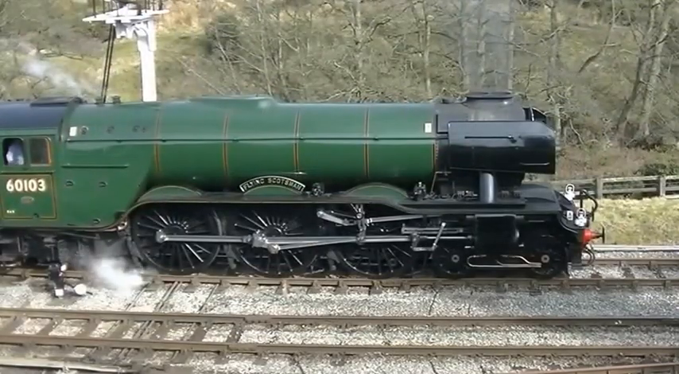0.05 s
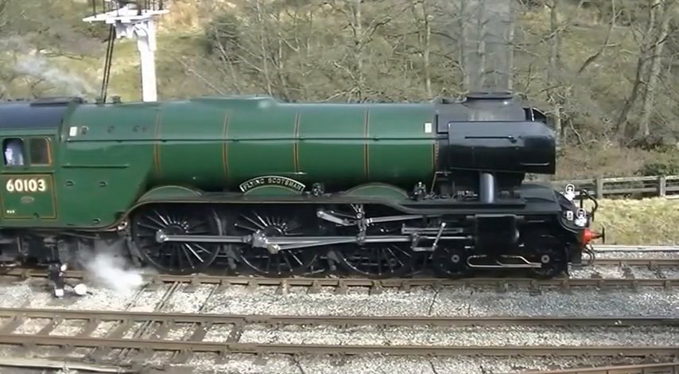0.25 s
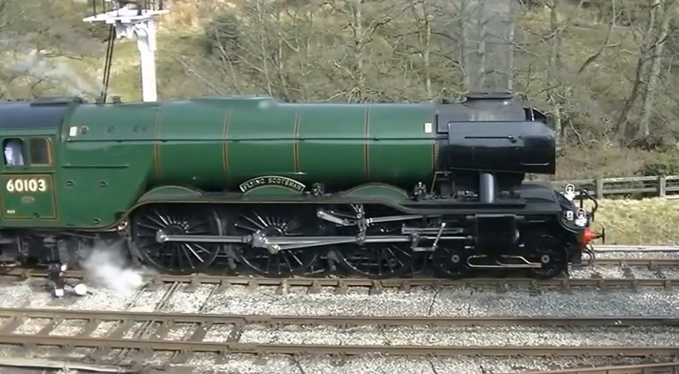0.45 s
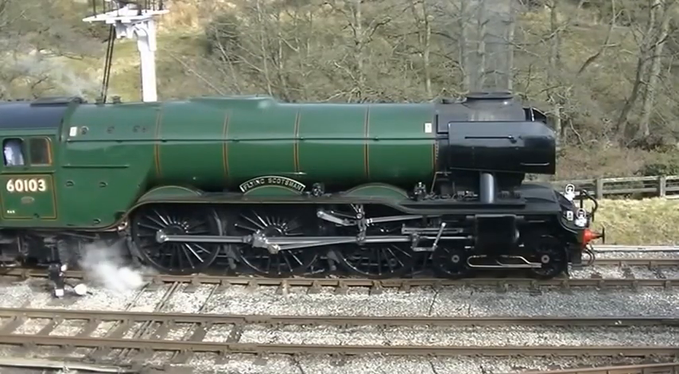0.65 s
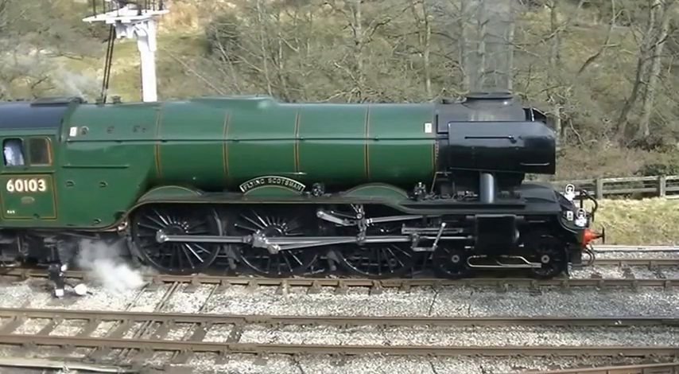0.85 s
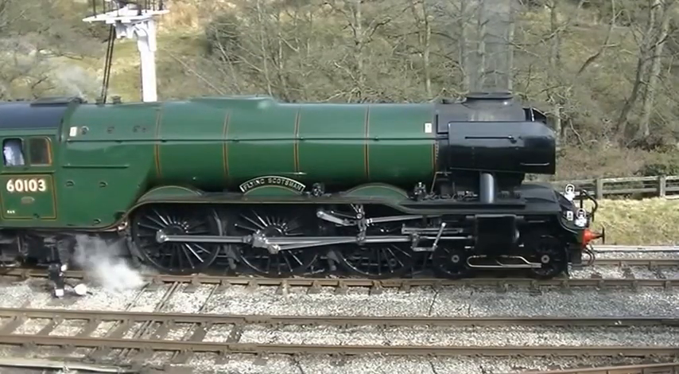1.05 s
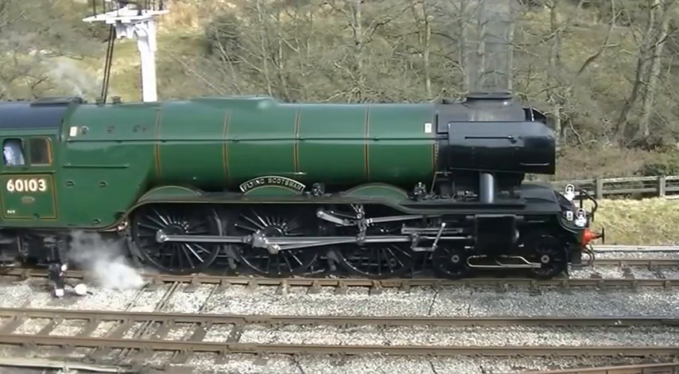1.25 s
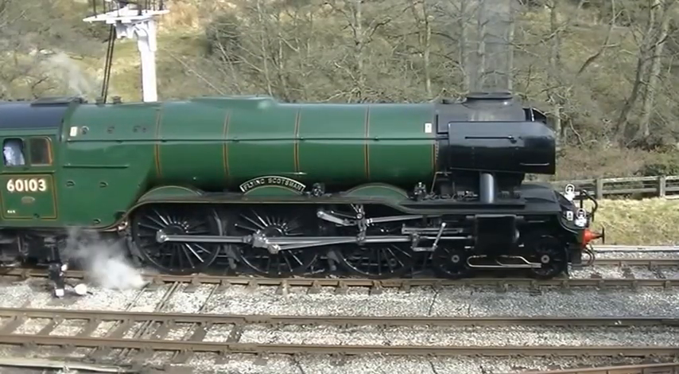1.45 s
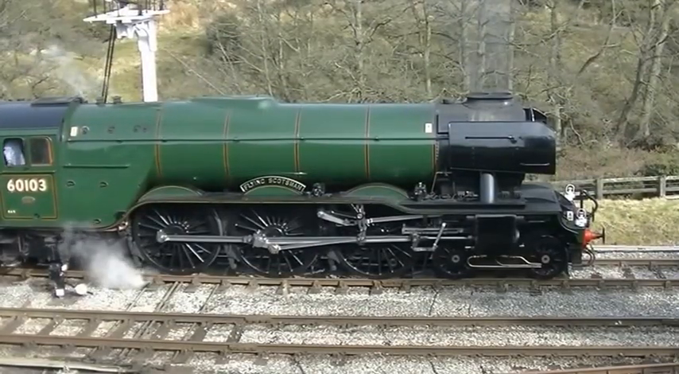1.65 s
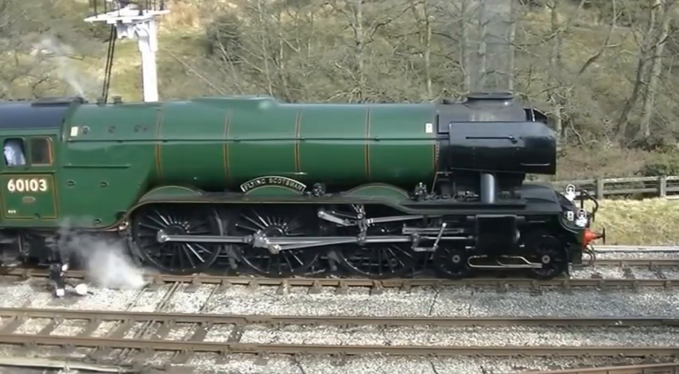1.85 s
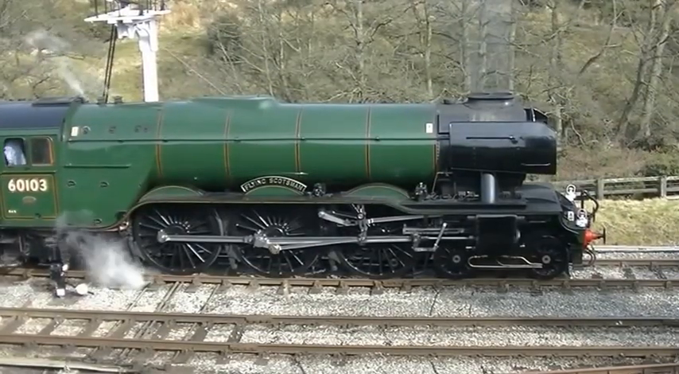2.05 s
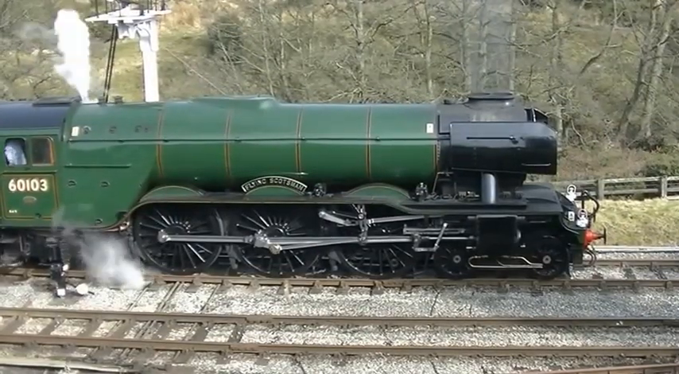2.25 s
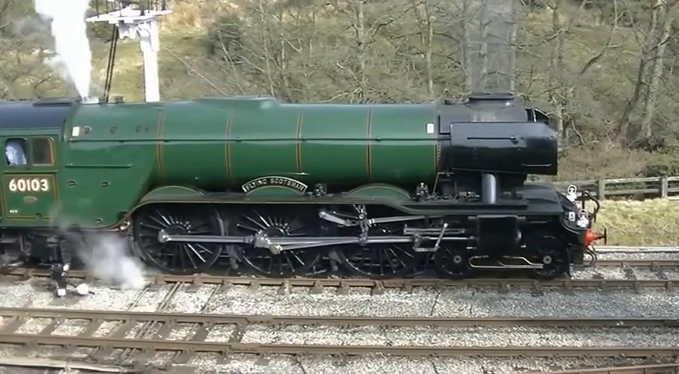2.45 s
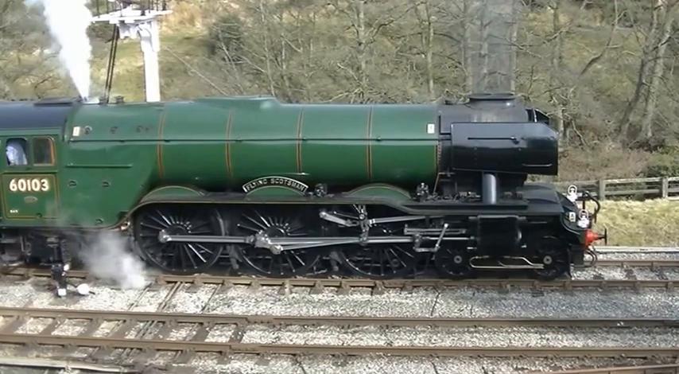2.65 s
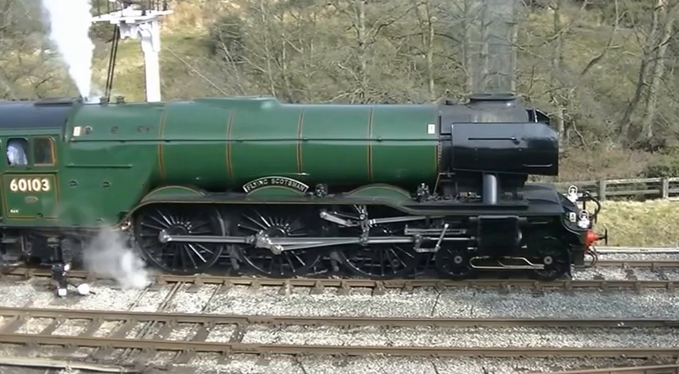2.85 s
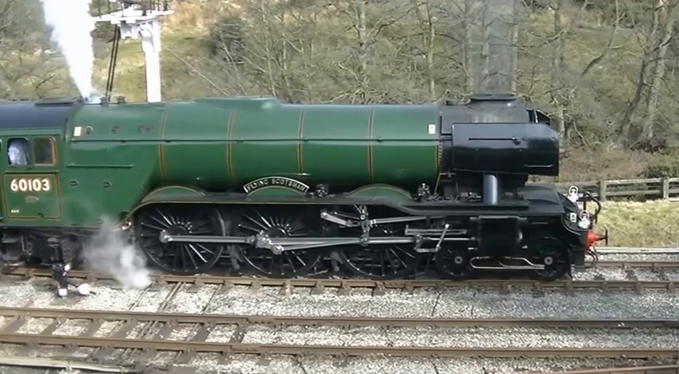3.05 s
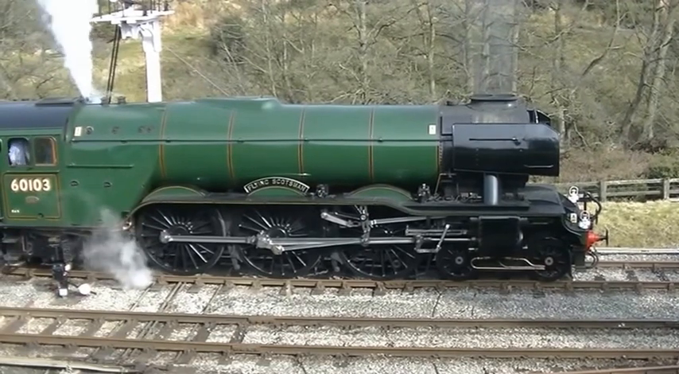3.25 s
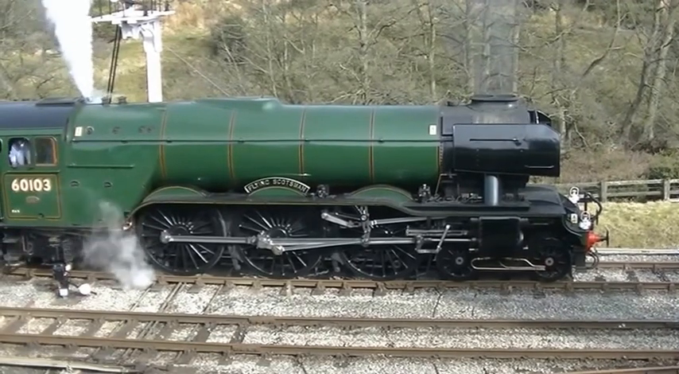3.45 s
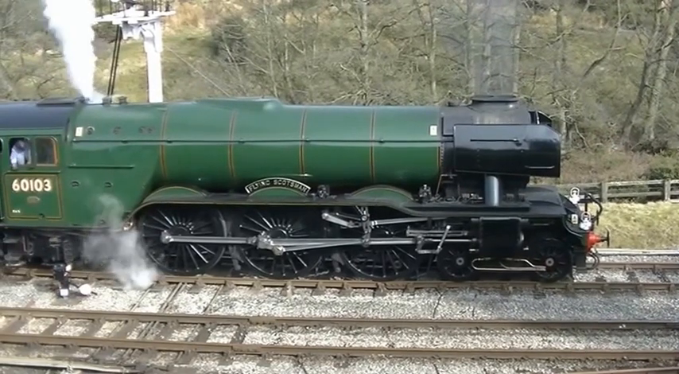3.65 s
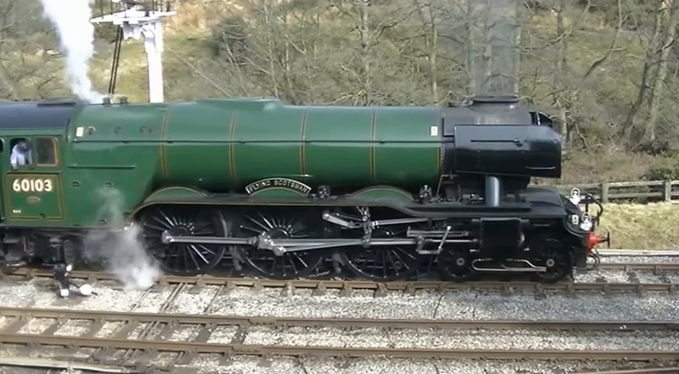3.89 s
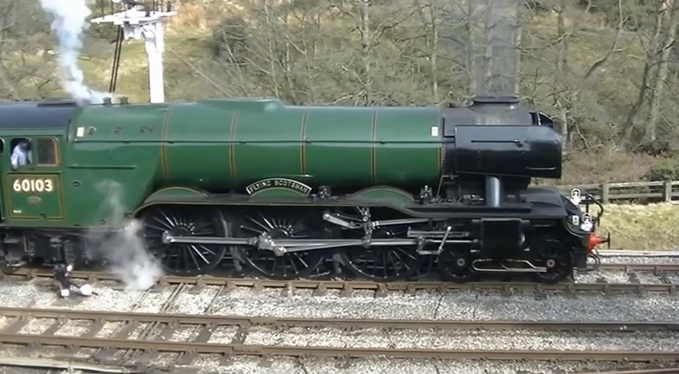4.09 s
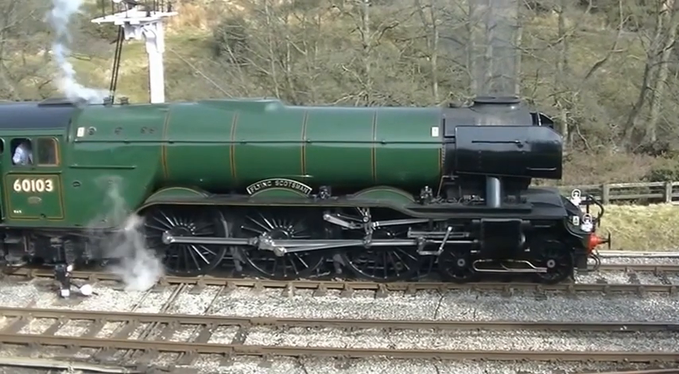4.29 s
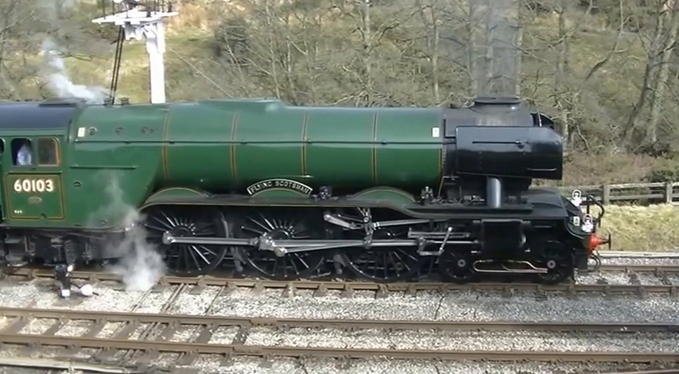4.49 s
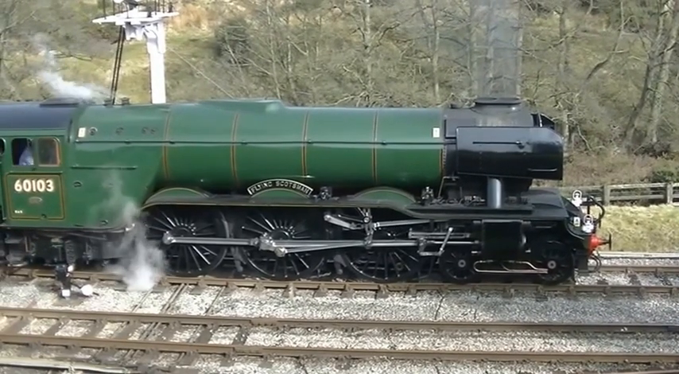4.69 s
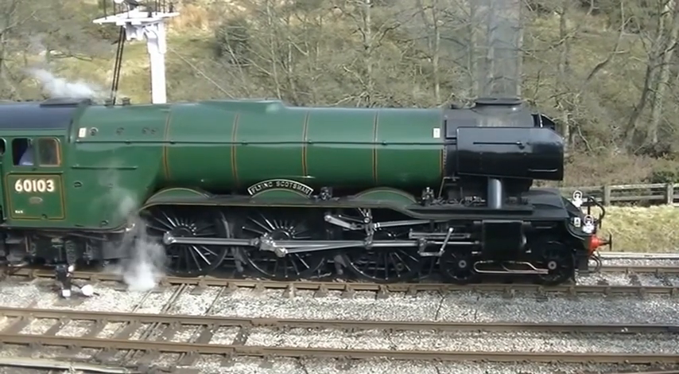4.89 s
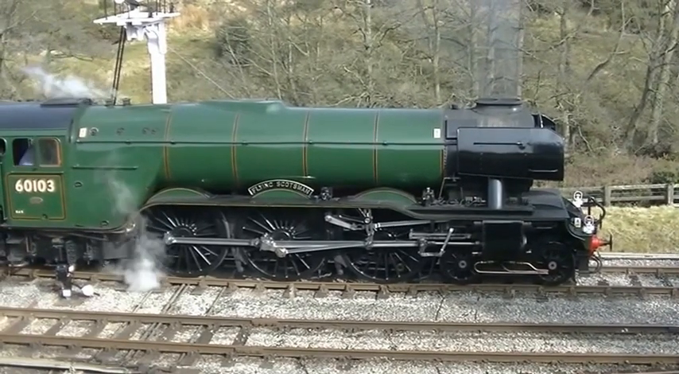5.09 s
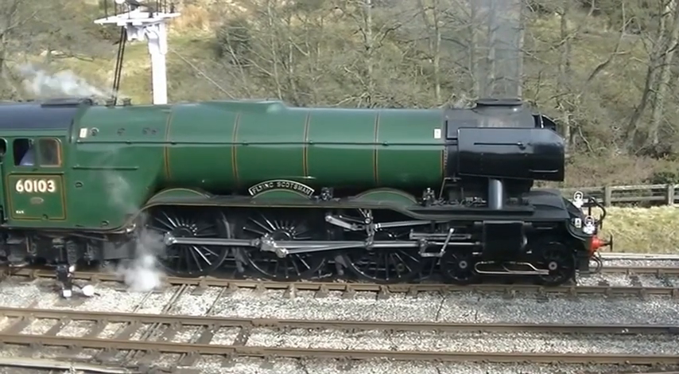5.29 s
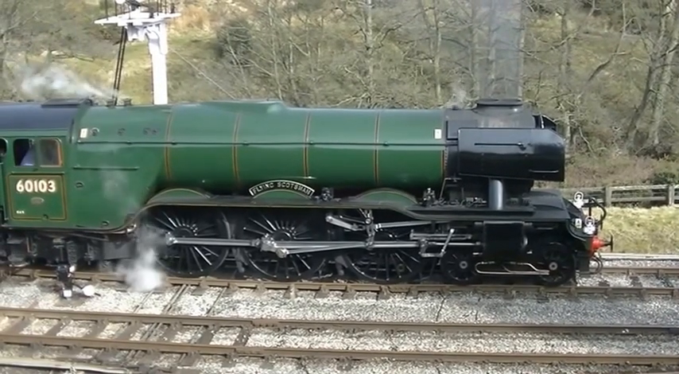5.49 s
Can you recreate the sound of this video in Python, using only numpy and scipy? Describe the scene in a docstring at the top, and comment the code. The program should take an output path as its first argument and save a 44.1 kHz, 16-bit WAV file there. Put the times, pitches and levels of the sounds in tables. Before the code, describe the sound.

A standing steam locomotive hisses steadily from a drain under its cab. About two seconds in, a puff and a rush of steam lead into one shrill whistle blast, which slides slightly up in pitch, holds for about a second and a half and cuts off. A faint echo fades off a wooded hillside while the hiss continues with a light sizzle. Heard outdoors through a camera's stereo microphone.

```python
"""Beside a wooded hillside, a standing steam locomotive heard on a camera's stereo microphone.
A drain under the cab hisses steadily. The whistle valve opens with a puff and a rush of steam;
the jet sets the bell sounding one shrill note, which climbs to pitch as the bell warms, holds,
and echoes off the hill. The camera's gain control pushes the hiss down while the whistle sounds."""
import sys
import numpy as np
from scipy import signal
from scipy.fft import rfft, irfft
from scipy.io import wavfile
from scipy.ndimage import uniform_filter1d

SR = 44100
rng = np.random.default_rng(int(sys.argv[2]) if len(sys.argv) > 2 else 0)


def unload_wav(signal):
    """Save mono or channel-first audio to the path in sys.argv[1] as 16-bit WAV at rate SR, clipped to [-1, 1]."""
    wavfile.write(
        sys.argv[1],
        SR,
        np.round(np.clip(np.atleast_2d(signal).T, -1, 1) * 32767).astype(np.int16),
    )


N = 243873
TIME = np.arange(N) / SR
FRAME_S, BIN_HZ = np.arange(N // 128 + 5) * 128 / SR, np.fft.rfftfreq(512, 1 / SR)
OPEN_S, EASE_S, SHUT_S = 2.212, 2.89, 3.925  # one pull on the valve: opens, eases back, snaps shut
SPEAK_S, ATTACK_S = 2.354, 0.03  # the bell speaks once the flow is strong, and builds this fast
# how the whistle's steam reaches the two microphone ports
# (frequency [Hz], likeness [0-1], left minus right [dB], left lead [rad])
WHISTLE_PORTS = [(500, 0.99, -0.1, 0.01), (2400, 0.998, 0.0, 0.0), (3400, 0.889, -0.1, 0.02),
                 (4300, 0.829, -1.7, 0.53), (5400, 0.831, -1.0, 0.74), (6400, 0.67, 7.9, -0.37),
                 (7400, 0.591, 0.7, -0.8), (8700, 0.869, -2.0, -0.05), (10300, 0.768, -3.5, 0.0),
                 (11400, 0.242, -3.3, 0.08), (12300, 0.447, -0.0, -0.24), (14200, 0.653, -0.3, -2.9)]


def whistle(level_db=-7, hot_hz=3036, wobble_rad=0.65, rasp_rad=0.079):
    """The bell sounds one shrill note, shaken by its own jet and rising as hot steam fills it."""
    # partials of the note (multiple, left [dB], right [dB], left lead [rad])
    harmonics = [(1, 1, 1.5, 0.26), (2, -20, -31, 4), (3, -32, -29, 0.4), (4, -55, -56, 0),
                 (5, -48, -48, 4.5)]
    # even overtones break off and catch again while the bell warms (time [s], level [dB])
    even_level = [(2.38, -8), (2.47, 4), (2.6, -20), (2.645, 1), (2.69, 4), (2.718, -14), (2.745, 1),
                  (2.81, 4), (2.843, -14), (2.875, 1.5), (2.99, 3), (3.07, -6.5), (3.14, 2.5), (3.27, -0.5),
                  (3.42, -3), (3.52, 3), (3.7, -4), (3.79, 1), (3.93, -9)]
    # odd overtones, brightest when the steam is wet (time [s], level [dB])
    odd_level = [(2.38, -8), (2.47, -3), (2.6, -6), (2.685, 8.5), (2.75, 1), (3.0, 1), (3.22, -2),
                 (3.36, 4.5), (3.65, 3.5), (3.72, -2), (3.87, 0), (3.93, -10)]
    # chirps and chokes as the note starts and ends (time [s], half length [s], gain [dB], bend [Hz])
    catches = [(2.361, 0.0042, 4, -67.5), (2.366, .002, -16, -0.5), (2.369, 0.0073, 4.5, 24),
               (2.4, .004, -6, -1.5), (2.442, 0.0064, -2.5, 38), (2.463, 0.01, -6.5, -2),
               (3.875, .006, -3, 2), (3.917, 0.0064, -13, -82)]
    blow = flow() ** 1.96 * rise(SPEAK_S, ATTACK_S)
    weak = (1 - blow / blow.max()) ** 2  # a weak blow rasps and sputters
    air_hz = 102.2 * np.exp(-since(SPEAK_S) / 0.0301)  # flat until the air is blown out
    cold_hz = 150 * np.exp(-since(SPEAK_S) / .33)  # and until the bell has warmed
    hz = hot_hz - air_hz - cold_hz - 9000 * since(SHUT_S)  # sags as the valve shuts
    catch_db = 0
    for s, half, db, bend_hz in catches:
        catch = pulse(s, half)
        catch_db += db * catch
        hz += bend_hz * catch
    # the bell holds the pitch while turbulence pushes the phase back and forth
    phase = 2 * np.pi * np.cumsum(hz) / SR + wobble_rad * wander(rate_hz=15.4)
    phase += rasp_rad * (1 + weak) * wander(rate_hz=270)
    note = np.zeros((2, N))
    for k, left_db, right_db, lead in harmonics:
        partial = amp([[left_db], [right_db]]) * np.sqrt(2) * np.sin(k * phase - np.array([[0], [lead]]))
        if k > 1:
            partial *= amp(along(odd_level if k % 2 else even_level, TIME) + 2 * wander(rate_hz=39))
        note += partial
    tremble_db = 0.65 * wander(rate_hz=150)
    sputter_db = 2.2 * weak * wander(rate_hz=45)
    return note * blow * amp(level_db + catch_db + tremble_db + sputter_db)


def hillside(note, engine_db=-19, trees_db=-25):
    """The note reaches the microphone directly, off the nearby engine, and from the slope farther off."""
    # the direct note shifts between the microphone ports (time [s], left minus right [dB])
    balance = [(2.38, -4), (2.46, 2.5), (2.6, 1), (2.75, 2), (2.95, 0.3), (3.22, 3), (3.55, 2), (3.9, 1)]
    # echoes off the hill (delay [s], left [dB], right [dB])
    hill_echoes = [(0.07, -31, -31), (0.21, -34, -35), (.31, -29, -29), (.45, -29, -29)]
    direct = note * amp(along(balance, TIME) * np.array([[.5], [-.5]]))
    engine = amp(engine_db) * scatter(note, delay_s=.004, t60_s=0.07)
    echoes = sum(amp([[left], [right]]) * np.roll(note, round(delay * SR), axis=1)
                 for delay, left, right in hill_echoes)
    trees = amp(trees_db) * amp([[-2.5], [1.5]]) * scatter(note, delay_s=0.11, t60_s=2.1)
    return direct + engine + echoes + trees


def flow(opening_s=0.18, closing_s=0.011, ease_db=6.5):
    """Steam through the whistle valve, 0-1: it drives the note, the rush and the sizzle."""
    eased = amp(-ease_db * (since(EASE_S) / (SHUT_S - EASE_S)) ** 2)
    return rise(OPEN_S, opening_s) * eased * np.exp(-(since(SHUT_S) / closing_s) ** 2)


def lip_rush(level_db=-23.5):
    """Steam rushes past the whistle's lip, growing with the flow."""
    # broad spectrum of the rush (frequency [Hz], level [dB])
    shape = [(25, -40), (150, -49), (300, -41.5), (550, -23.5), (900, -31.5), (1550, -21), (2400, -11),
             (3050, -0.5), (4500, -17), (7200, -21), (10200, -17), (11300, -31), (15500, -32.5)]
    # resonances of the bell (frequency [Hz], width [Hz], lift [dB])
    peaks = [(637, 270, 9.5), (1120, 510, 26), (1911, 250, 8.5), (2696, 70, 6.5), (3980, 490, 9),
             (4970, 650, 14.5), (6120, 900, 7.5), (7900, 200, 10), (8880, 820, 2.5), (12173, 998, 4)]
    rush = jet(shape, peaks, WHISTLE_PORTS, patchy_db=2.0, flutter_db=0.5, drift_db=1.5)
    return amp(level_db) * flow() ** 1.3 * rush


def valve_sizzle(level_db=-41, weep_db=-49.5, weep_s=4.55):
    """Wet steam sizzles and spits in the valve, which starts to weep after the blast."""
    # broad spectrum of the sizzle (frequency [Hz], level [dB])
    shape = [(100, -58.5), (3000, -21), (6000, -2), (8800, -7), (10200, -10), (11500, -17), (15500, -22.5)]
    # resonances of the valve's gap (frequency [Hz], width [Hz], lift [dB])
    peaks = [(8000, 260, 3), (8870, 600, 4.5)]
    # slugs of water spit through (time [s], half length [s], level [dB])
    slugs = [(2.69, 0.041, -32), (2.98, 0.16, -36.5), (3.49, 0.22, -36), (3.782, 0.062, -49),
             (4.395, .1, -55), (4.68, 0.097, -42.5)]
    spurts = [amp(db) * pulse(s, half) for s, half, db in slugs]
    level = np.linalg.norm([amp(level_db) * flow(), amp(weep_db) * rise(weep_s, .06), *spurts], axis=0)
    return level * jet(shape, peaks, WHISTLE_PORTS, patchy_db=2.5, flutter_db=1.3, drift_db=1.0)


def cough(level_db=-36.5, rise_s=.008, fade_s=0.046):
    """The first steam clears the cold bell with a hollow puff that trails into the note."""
    # spectrum of the puff (frequency [Hz], level [dB])
    shape = [(100, -47), (350, -26.5), (700, -5), (1200, -4.5), (1650, -5), (2400, -6), (3200, -25),
             (8000, -28), (15500, -48)]
    level = amp(level_db) * rise(OPEN_S, rise_s) * (1 - rise(SPEAK_S, fade_s))
    return level * jet(shape, [], WHISTLE_PORTS, patchy_db=1.5, flutter_db=7.0, drift_db=-1.0)


def undertone(pitch_hz=2850, width_hz=24, rest_db=-49, slack_db=-38, slack_s=1.53):
    """Steam seeping past the valve makes the bell's resonance sing faintly until the note takes over."""
    seep = np.hypot(amp(rest_db), amp(slack_db) * rise(slack_s, .35))  # the lever's slack is taken up
    seep *= 1 - rise(SPEAK_S, ATTACK_S)
    phase = 2 * np.pi * pitch_hz * TIME
    return seep * (wander(width_hz) * np.cos(phase) + wander(width_hz) * np.sin(phase))


def drain(ring_hz=2860, ring_width_hz=280):
    """The steady jet under the cab; its resonances swell and fade one by one."""
    # broad spectrum of the jet (frequency [Hz], level [dB])
    shape = [(25, -46), (150, -42), (280, -30), (600, -19.5), (1200, -2), (2200, -5), (2500, -8),
             (4400, -1.48), (5500, -2), (7200, -18), (10400, -21.5), (11500, -28), (15500, -36)]
    # resonances of the pipe and the space under the frames (frequency [Hz], width [Hz], gain [dB])
    peaks = [(224.4, 30, 11), (275, 24, -6.5), (449, 21, 6), (508, 105, 10), (666, 53.5, 17),
             (740.6, 65, 12.5), (777, 17, 10.5), (874, 22, 3.5), (1009, 127, 10), (1193, 33, 3.5),
             (1285, 31, 5.5), (1430, 87, 6.5), (1514, 17, 7), (1660, 137, 6.5), (1654, 20.5, 5.5),
             (1924, 130, 9), (2105, 60, 6), (2333, 67, 3.5), (2500, 100, 1), (2720, 57, 10.5),
             (2872, 172, 10), (3414, 213, 8), (3819, 200, 13), (4140, 190, 6), (4700, 110, -1.5),
             (4980, 130, 8.5), (5262, 126, 9.5), (6020, 140, -6.5), (6530, 740, 5.5), (7610, 170, 9.5),
             (12800, 980, 6)]
    # notches between them (frequency [Hz], width [Hz], gain [dB])
    notches = [(700, 24, -4.5), (817, 24, -3.5), (902, 24, -7), (1105, 37, -5), (1500, 18, -6),
               (1780, 60, -2), (2296, 40, 1.5), (2510, 55, -5.5)]
    # resonances that sway at random in the breeze (frequency [Hz], width [Hz], depth [dB])
    swaying = [(734, 220, 0.84), (3340, 350, 2), (4290, 560, 1.5), (4730, 130, 6)]
    # the drain's ring around ring_hz (time [s], gain [dB])
    ring_level = [(0, 10.5), (.15, 0), (.85, 0), (1.1, -11.5), (1.3, -3.5), (1.5, 5.5), (1.63, -13.5),
                  (1.75, 3), (2.1, 2), (4.4, 1.5), (5.53, 1)]
    # how the hiss reaches the two microphone ports
    # (frequency [Hz], likeness [0-1], left minus right [dB], left lead [rad])
    ports = [(300, 0.968, -1.0, 0.03), (1000, 0.974, -1.3, 0.17), (2400, 0.98, -0.1, -0.03),
             (2950, 0.786, -3.9, -0.3), (3500, 0.888, -4.5, 0.45), (5300, 0.909, -2.4, 0.51),
             (6000, 0.694, 3.8, 1.22), (6800, 0.718, 5.3, 0.39), (8200, 0.571, 3.6, -1.14),
             (10400, 0.676, -5.3, -0.16), (11600, 0.206, -4.6, 1.7), (12800, 0.693, -0.6, 0.4),
             (14500, 0.137, -0.4, 3.0)]
    # steam leaving the drain (time [s], level [dB])
    level = [(0, -28.5), (2.15, -28.5), (3.9, -33), (4.5, -30), (5.53, -31)]
    sway_db = np.outer(along(ring_level, FRAME_S), bump(BIN_HZ, ring_hz, ring_width_hz))
    for hz, width, depth_db in swaying:
        breeze = np.interp(FRAME_S, TIME, wander(rate_hz=5))
        sway_db += depth_db * np.outer(breeze, bump(BIN_HZ, hz, width))
    hiss = jet(shape, peaks + notches, ports, patchy_db=2.0, flutter_db=0.12, drift_db=0.5,
               sway_db=sway_db)
    return amp(along(level, TIME)) * hiss


def jet(shape, peaks, ports, patchy_db, flutter_db, drift_db, sway_db=0):
    """Turbulent steam noise of rms 1, coloured by resonances and picked up at two microphone ports."""
    grid = (len(FRAME_S), len(BIN_HZ))
    swirl_db = patchy_db * eddies(grid, frames=12, bins=6)  # single resonances flare up
    swirl_db += flutter_db * eddies(grid, frames=10, bins=80)  # the whole jet flutters
    swirl_db += drift_db * eddies(grid, frames=48, bins=3)  # its colour drifts in the breeze
    swirl_db *= at_hz([(500, 0.5), (3500, 1)], BIN_HZ)  # the deep roar is steadier than the treble
    noise = rng.standard_normal((2, *grid)) + 1j * rng.standard_normal((2, *grid))
    noise *= amp(swirl_db + sway_db)
    common, apart = rfft(signal.istft(noise.swapaxes(1, 2), nperseg=512, noverlap=384)[1][:, :N])
    hz = np.fft.rfftfreq(N, 1 / SR)
    colour_db = at_hz(shape, hz) + sum(db * bump(hz, f, width) for f, width, db in peaks)
    port_hz, *columns = np.transpose(ports)
    alike, balance_db, lead = (at_hz(np.c_[port_hz, column], hz) for column in columns)
    right = (alike * common + np.sqrt(1 - alike ** 2) * apart) * np.exp(-1j * lead)
    pair = np.array([common * amp(balance_db / 2), right * amp(-balance_db / 2)])
    return unit(irfft(pair * amp(colour_db), N))


def scatter(x, delay_s, t60_s):
    """Many faint echoes of random sign, dying away, different at each port."""
    t = np.arange(SR) / SR
    taps = rng.standard_normal((2, SR)) * (rng.random((2, SR)) < 1 / 20)
    taps *= (t > delay_s) * amp(-60 * t / t60_s)
    return signal.fftconvolve(x, taps / np.linalg.norm(taps, axis=1, keepdims=True), axes=1)[:, :N]


def eddies(grid, frames, bins):
    """Random patches of rms 1 over time and frequency."""
    smooth_in_time = uniform_filter1d(rng.standard_normal(grid), frames, axis=0)
    return unit(uniform_filter1d(smooth_in_time, bins, axis=1))


def wander(rate_hz):
    """Smooth random motion of rms 1, up to the given rate."""
    hz = np.fft.rfftfreq(N, 1 / SR)
    return unit(irfft(rfft(rng.standard_normal(N)) / (1 + (hz / rate_hz) ** 4), N))


def since(start_s):
    """Seconds gone by since a moment; zero before it."""
    return np.maximum(TIME - start_s, 0)


def rise(start_s, lag_s):
    """Climbs from 0 towards 1 with the given time constant."""
    return 1 - np.exp(-since(start_s) / lag_s)


def pulse(peak_s, half_s):
    """A smooth swell and fall around a moment, 0-1."""
    return np.exp(-((TIME - peak_s) / half_s) ** 2)


def bump(hz, centre_hz, width_hz):
    """Bell-shaped outline of one resonance, 0-1."""
    return .5 ** ((2 * (hz - centre_hz) / width_hz) ** 2)


def at_hz(points, hz):
    """Reads a spectrum on a log-frequency axis."""
    f, value = np.transpose(points)
    return np.interp(np.log(hz + 1), np.log(f + 1), value)


def along(points, s):
    """Reads a curve at the given times."""
    return np.interp(s, *np.transpose(points))


def amp(db):
    """Decibels to amplitude."""
    return 10 ** (np.asarray(db) / 20)


def unit(x):
    """Scales to rms 1."""
    return x / np.sqrt(np.mean(x ** 2) + 1e-20)


def scene():
    """At the microphone: one whistle blast and its echoes over the hiss of the drain."""
    return drain() + cough() + lip_rush() + valve_sizzle() + undertone() + hillside(whistle())


def record(dry, threshold_db=-25.5, ratio=7.8, recovery_db_per_s=48, rumble_db=-93, cutoff_hz=15780):
    """The camera's gain control, a faint low rumble in the microphone, and the band limit."""
    power_db = 10 * np.log10(abs(uniform_filter1d((dry ** 2).mean(0), size=1100)) + 1e-12)
    fall = TIME * recovery_db_per_s
    held_db = np.maximum.accumulate(power_db + fall) - fall  # clamps at once, lets go gradually
    duck_db = uniform_filter1d(np.maximum(held_db - threshold_db, 0), size=900) * (1 - 1 / ratio)
    gusts = amp(rumble_db + 3.5 * wander(rate_hz=8))
    rumble = gusts * unit(wander(rate_hz=89) + np.array([wander(rate_hz=120), wander(rate_hz=130)]))
    low_pass = signal.firwin(801, cutoff_hz, window=("kaiser", 9), fs=SR)
    return signal.oaconvolve(dry * amp(-duck_db) + rumble, low_pass[None], "same")


dry = scene()
out = record(dry)
unload_wav(out)
```